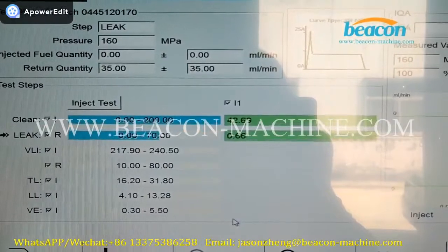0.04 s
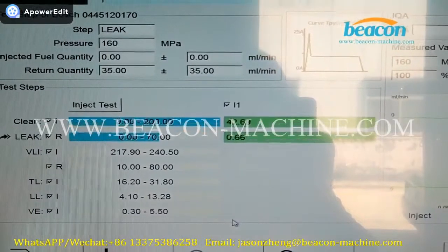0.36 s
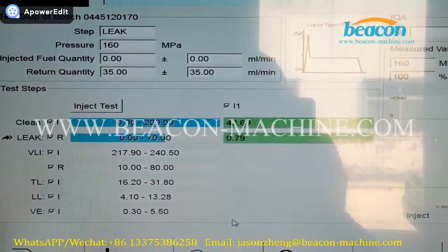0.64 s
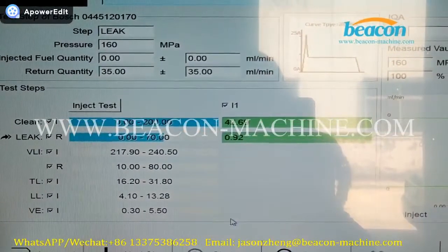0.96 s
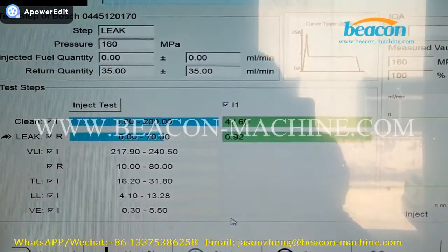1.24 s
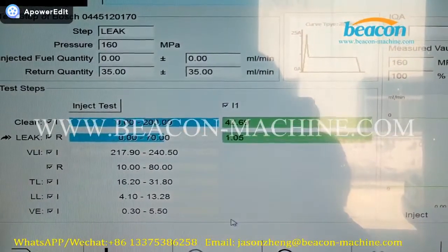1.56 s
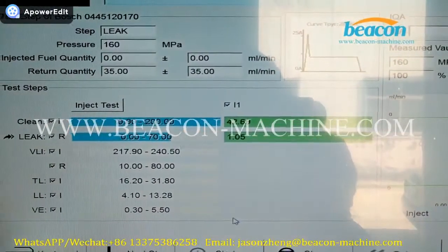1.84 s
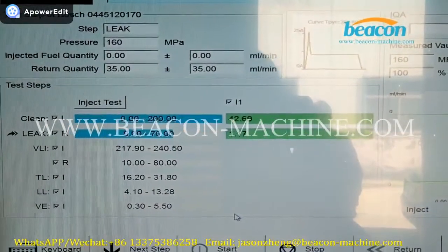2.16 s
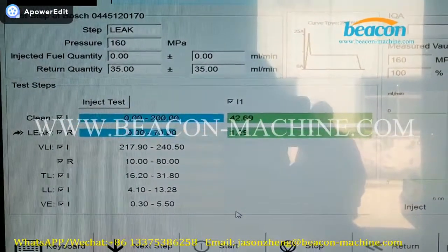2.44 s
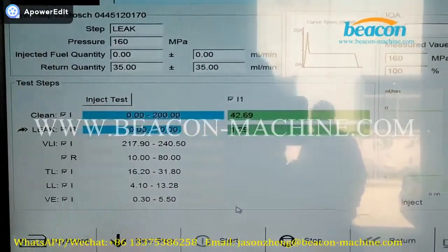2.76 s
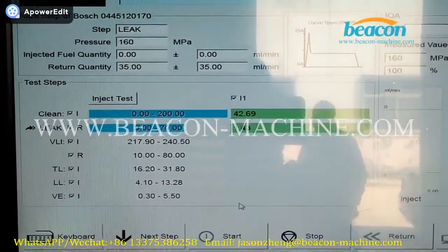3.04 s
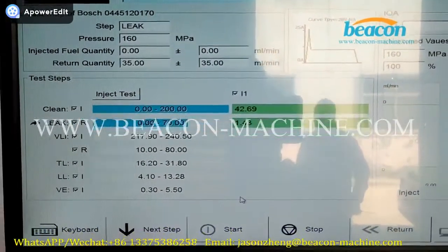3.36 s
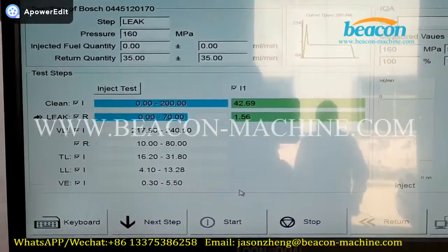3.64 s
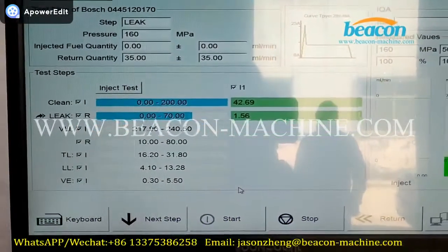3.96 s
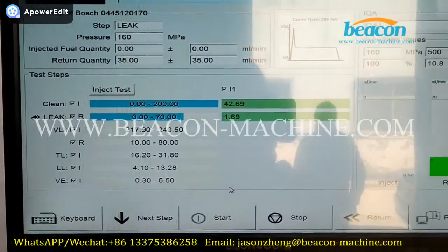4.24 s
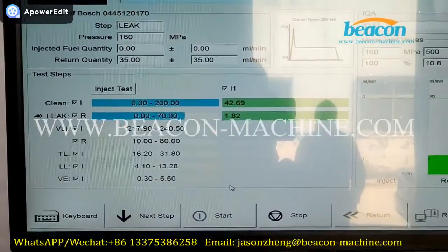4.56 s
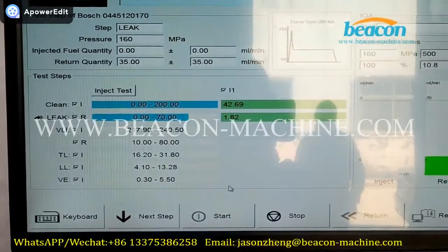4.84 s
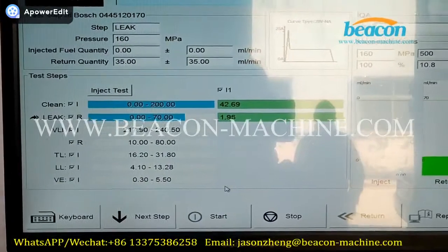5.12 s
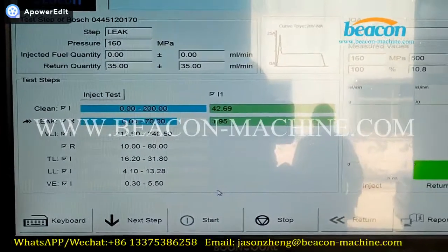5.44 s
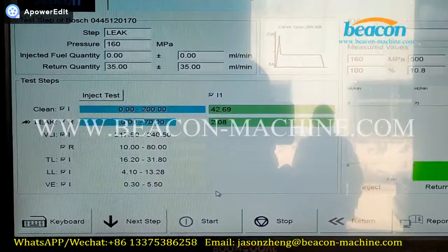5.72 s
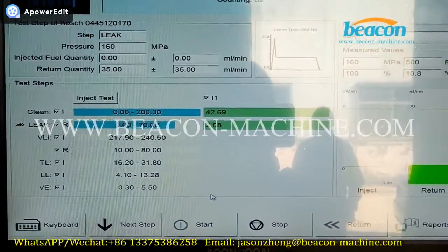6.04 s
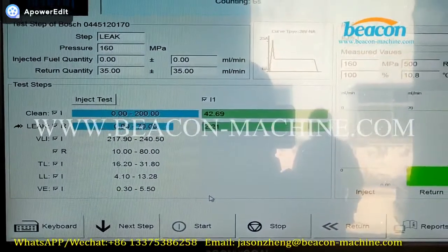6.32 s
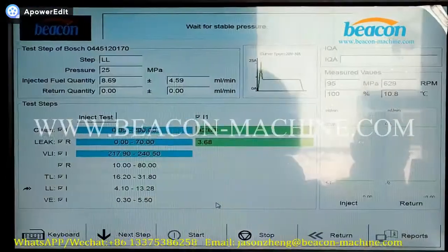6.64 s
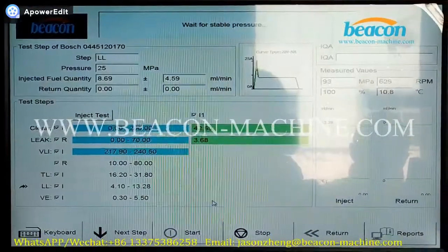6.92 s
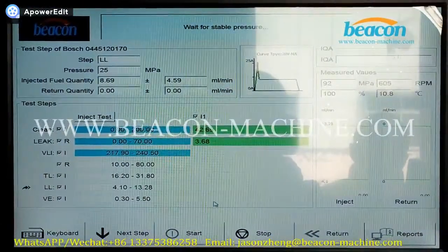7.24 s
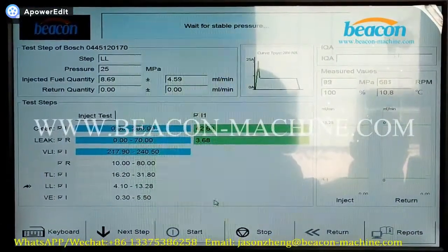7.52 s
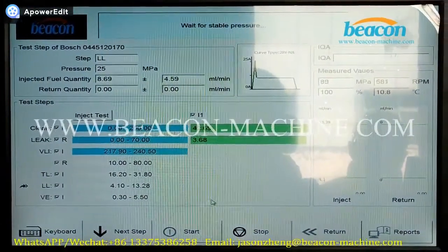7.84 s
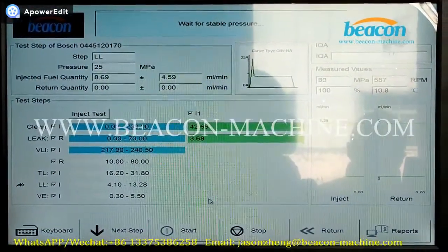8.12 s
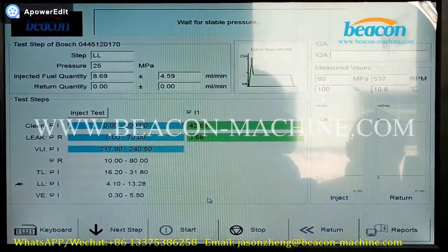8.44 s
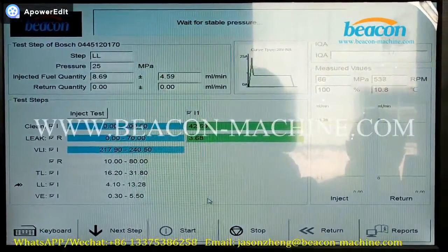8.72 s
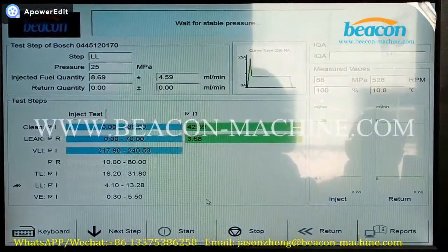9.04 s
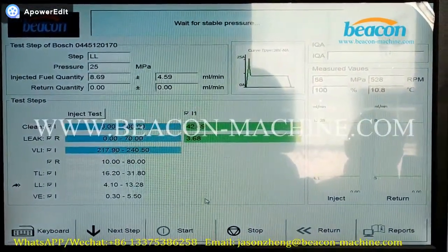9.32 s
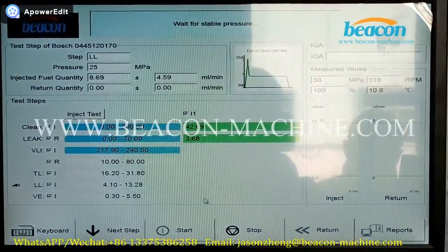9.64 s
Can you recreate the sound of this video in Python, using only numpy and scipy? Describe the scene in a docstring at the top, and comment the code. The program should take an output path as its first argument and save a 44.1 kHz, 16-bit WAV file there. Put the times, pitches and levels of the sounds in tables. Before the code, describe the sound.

Heard up close in a workshop, a test machine whines at a high, even pitch above fan noise and the fast, regular pulsing of a fuel pump that knocks now and then. About three quarters of the way through, a pressure valve opens abruptly and the sound becomes a louder, fuller drone: a harsh buzz, sputtering fuel hiss and irregular low throbs, with the whine continuing underneath.

```python
"""In a workshop, a diesel injector test bench runs, heard close by through two microphones.
Over fans and a hum, an inverter (the motor's electronic drive) whines around 4 kHz,
while the motor turns a fuel pump that throbs once a turn. After about 7.5 seconds
a pressure valve starts to buzz and spill fuel with a hiss, and the unloaded pump throbs unevenly."""
import sys
import numpy as np
from scipy import signal
from scipy.fft import rfft, irfft
from scipy.io import wavfile
from scipy.ndimage import uniform_filter1d, map_coordinates

SR = 44100
rng = np.random.default_rng(int(sys.argv[2]) if len(sys.argv) > 2 else 0)


def file_out(sig):
    """Save sig as 16-bit WAV at sys.argv[1]."""
    # one column per channel
    cols = np.atleast_2d(sig).T
    # limit, then scale
    lim = np.clip(cols, -1, 1)
    pcm = np.round(lim * 32767).astype(np.int16)
    wavfile.write(sys.argv[1], SR, pcm)


N = 435708
T = np.arange(N) / SR
FREQS = np.maximum(np.arange(N // 2 + 1) * SR / N, 1)

TURN_HZ, VALVE_HZ = 8.31, 100 / 3   # pump turns and valve ticks per second
CARRIER_HZ, STATOR_HZ = 4000, 16.95   # how fast the inverter switches and the motor's current swings
VALVE_OPENS_S, PUMP_REFILLS_S = 7.524, 7.88
MIC_DELAYS_S = np.array([[0], [0.00022]])   # left, right


def from_db(db):
    """Turn decibels into a gain to multiply by."""
    return 10 ** (np.asarray(db) / 20)


def at_hz(points, hz):
    """Read between the rows of a (Hz, value) table, giving every octave equal room."""
    known_hz, values = np.transpose(points)
    return np.interp(np.log(hz), np.log(known_hz), values)


def in_time(rows):
    """Join rows that begin with a time into one curve for each other column."""
    times, *columns = np.transpose(rows)
    return [np.interp(T, times, column) for column in columns]


def switch(at_s, rise_s):
    """A smooth step from 0 to 1."""
    return .5 + .5 * np.tanh((T - at_s) / rise_s)


def pan(db):
    """Left and right gains that make the left side db louder and keep the total power."""
    gains = from_db(np.array([[db], [-db]]) / 2)
    return gains / np.sqrt(np.mean(gains ** 2))


def drift(rate):
    """A smooth random wobble of size about 1, changing about rate times a second."""
    knots = rng.standard_normal(1000)
    coarse = map_coordinates(knots, [T[::50] * rate], order=3, mode="wrap")
    return np.interp(T, T[::50], coarse)


def with_turn(depth_db, place):
    """A gain that peaks at one place (0-1) in every pump turn."""
    return from_db(depth_db * np.cos(2 * np.pi * (TURN_HZ * T - place)))


def hump(hz, width_hz, at=FREQS):
    """The steep-sided shape of a resonance, in dB, with its top at 0."""
    return -20 * np.log10(1 + ((at - hz) / (0.68 * width_hz)) ** 2)


# How alike the two microphones sound. Each row: frequency in Hz, likeness from 0 to 1.
MIC_LIKENESS = [(30, .55), (120, .88), (300, .82), (700, .6), (4000, .6), (8000, .66), (15000, .5)]
# How far the left microphone's wave runs ahead. Each row: frequency in Hz, lead in radians.
LEFT_LEAD = [(20, 0), (340, .3), (690, 1.0), (1250, 3.0), (2600, 6.5), (4100, 11.0), (5400, 16.5),
             (6400, 18.8), (16000, 18.8)]
def noise(db_per_hz):
    """Stereo noise: a direct part that reaches the right side late, plus each side's own room sound."""
    direct, left, right = rfft(rng.standard_normal((3, N)))
    alike = at_hz(MIC_LIKENESS, FREQS)
    arriving = np.array([direct, direct * np.exp(-1j * at_hz(LEFT_LEAD, FREQS))])
    mixed = np.sqrt(alike) * arriving + np.sqrt(1 - alike) * np.array([left, right])
    return irfft(mixed * from_db(db_per_hz) * np.sqrt(SR / 2), N)


def tone(hz, level_db, pan_db, lead, waver_db, start=0):
    """A pure tone that wavers as the microphones move through the room's loud and quiet spots."""
    angle = 2 * np.pi * (hz * T + start) - lead * np.array([[0], [1]])
    return np.sqrt(2) * from_db(level_db + waver_db * drift(1.582)) * pan(pan_db) * np.sin(angle)


def beating_phases(multiples, level_db, lead, depth, beats=1, tries=800, centre=0, spread=1):
    """Pick the random wave starts (in turns) whose sum best swells by depth, beats times a cycle."""
    starts = centre + spread * (rng.random((tries, len(multiples))) - .5)
    waves = from_db(level_db)[:, None] * np.exp(2j * np.pi * np.outer(multiples, np.arange(256) / 256))
    sides = np.exp(2j * np.pi * starts - 1j * np.array([0 * lead, lead])[:, None]) @ waves
    ripple = abs(rfft(abs(sides) ** 2))
    wanted = depth / 2 * (np.arange(ripple.shape[-1]) == beats)
    miss = np.sum((ripple / ripple[..., :1] - wanted) ** 2, axis=(0, 2))
    return starts[miss.argmin()]


def cycle(rate_hz, level_db, pan_db, lead, depth=0, delay_s=0, spread=1):
    """A rough sound that repeats exactly, built from harmonics (whole multiples of its rate)."""
    size = 2 ** 14
    gains = from_db(level_db + np.array([pan_db, -pan_db]) / 2)
    gains /= np.sqrt(np.cosh(pan_db * np.log(10) / 20))   # panning keeps the power
    centre = -rate_hz * np.cumsum(np.broadcast_to(delay_s, lead.shape))
    start = beating_phases(np.arange(len(lead)), level_db, lead, depth, centre=centre, spread=spread)
    harmonics = gains * np.exp(2j * np.pi * start - 1j * np.array([0 * lead, lead]))
    waves = irfft(np.pad(harmonics, ((0, 0), (1, 0))), size) * size / np.sqrt(2)
    return np.array([np.interp(T * rate_hz % 1 * size, np.arange(size), wave) for wave in waves])


def swells(rows, hz, half_s, detune, squareness=2, fade=1):
    """For each (peak second, dB) row a note swells, then dies away fade times as fast as it rose."""
    out = np.zeros((2, N))
    for (peak_s, level_db), chance in zip(rows, rng.standard_normal(len(rows))):
        near = slice(*np.searchsorted(T, [peak_s - 4 * half_s, peak_s + 4 * half_s]))
        t = T[near] - peak_s - MIC_DELAYS_S
        envelope = np.exp(-.5 * abs(np.where(t > 0, fade, 1) * t / half_s) ** squareness)
        note = np.cos(2 * np.pi * hz * (1 + detune * chance) * t)
        out[:, near] += np.sqrt(2) * from_db(level_db) * envelope * note
    return out


# Fans and flow in the cabinet. Each row: frequency in Hz, level in dB per Hz.
CABINET_NOISE = [(20, -101), (35, -95), (90, -78.5), (300, -75.5), (700, -98), (1000, -81.5), (1600, -86),
                 (2300, -92), (3000, -86.5), (3400, -86), (4550, -87.5), (5000, -82), (7000, -92),
                 (10000, -99), (14000, -102)]
def cabinet(opened, stall_share=0.65, flow_hz=380):
    """Fans and flow rush; the low part stalls from when the valve opens until the pump refills."""
    air = noise(at_hz(CABINET_NOISE, FREQS)) * from_db(drift(20)) * with_turn(1.0, 0.22)
    flow = irfft(rfft(air) * (FREQS < flow_hz), N)
    stalled = opened * (1 - switch(PUMP_REFILLS_S, .06))
    return air - stall_share * flow * stalled


# A faint scuff. Each row: peak in seconds, half length in seconds, pitch in Hz, width in Hz, dB per Hz.
SCUFFS = [(6.846, 0.059, 2100, 1800, -84.5)]
def scuff():
    """Something scuffs in the workshop: a short, soft puff of noise."""
    return sum(noise(db + hump(hz, width)) * np.exp(-.5 * ((T - peak_s) / half_s) ** 2)
               for peak_s, half_s, hz, width, db in SCUFFS)


# Light taps on a panel. Each row: start in seconds, level in dB.
TAPS = [(4.253, -52), (4.436, -38), (4.796, -50)]
# The notes the panel rings with. Each row: pitch in Hz, dB added to the tap's level.
PANEL_NOTES = [(870, -10), (974, 0)]
def panel_taps(ring_s=.03):
    """Each tap sets the panel ringing; it fades by 60 dB in ring_s."""
    out = np.zeros((2, N))
    for start_s, level_db in TAPS:
        near = slice(*np.searchsorted(T, [start_s, start_s + 2 * ring_s]))
        t = np.maximum(T[near] - start_s - MIC_DELAYS_S, 0)
        for hz, db in PANEL_NOTES:
            out[:, near] += from_db(level_db + db - 60 * t / ring_s) * np.sin(2 * np.pi * hz * t)
    return out


# Thin electronic tones. Each row: pitch in Hz, base level in dB, pan in dB, left lead in radians.
THIN_TONES = [(550, -59.8, -1, 1.4), (4829, -69.3, -3, -0.1), (5000, -66.4, 0, 1.7), (7747, -64.1, 0, 0.1),
              (7966, -67.1, 0, 0.1), (8000, -58.0, 0, -0.1), (8034, -65.1, 2, 0.1), (8247, -66.5, 1, 0)]
# How they rise and fall together. Each row: time in seconds, added level in dB.
THIN_GAIN = [(0.1, 1.5), (0.9, 2.5), (3.2, -0.5), (3.5, 4.5), (4.0, 2), (4.4, 2), (5.0, 2.5), (5.4, 1.5),
             (5.8, -1), (6.7, -0.5), (7.45, -2), (7.6, -6)]
def electronics():
    """The electronics give off thin tones of steady pitch."""
    tones = sum(tone(*row, waver_db=1.0, start=rng.random()) for row in THIN_TONES)
    return tones * from_db(in_time(THIN_GAIN)[0])


# The tone an octave above the whistle. Each row: time in seconds, base level in dB.
WHISTLE_OCTAVE = [(0.2, -62), (0.85, -60.5), (1.3, -62), (2.5, -60.5), (3.1, -58.5), (3.7, -58.5),
                  (4.8, -65.5), (5.4, -57), (6.2, -62.5), (6.9, -64)]
def whistle(opened, hz=1250):
    """A steady whistle and its octave; both get quieter when the valve opens."""
    lead = -2.61 + .06 * T   # shifts as the microphones move
    main = tone(hz, -45 - 12 * opened, pan_db=3, lead=lead, waver_db=.5)
    octave_db = in_time(WHISTLE_OCTAVE)[0] - 0.5 - 9.1 * opened
    return main + tone(2 * hz, octave_db, pan_db=-2, lead=.4, waver_db=.5)


# Mains hum and tones of the frame. Each row: pitch in Hz, level in dB.
FRAME_TONES = [(250, -53), (300, -51), (383.3, -57.5), (386.3, -57.5), (483, -62)]
def frame_hum(opened):
    """The frame hums until the load comes off; two close pitches beat against each other."""
    tones = sum(tone(hz, db, 0, at_hz(LEFT_LEAD, hz), waver_db=.5, start=rng.random())
                for hz, db in FRAME_TONES)
    return tones * (1 - opened)


def motor_load(first_s=1.33, every_s=1.5, rebound_s=0.32, half_s=0.1):
    """The motor slips behind its magnetic field, so its load (0-1) peaks and rebounds in a slow beat."""
    since = T - first_s - np.array([[0], [rebound_s]])
    from_peak_s = (since + every_s / 2) % every_s - every_s / 2
    peak, rebound = np.exp(-.5 * (from_peak_s / half_s) ** 2)
    return peak + rebound


def motor_hum(opened, drop_db=23, return_db_per_s=6.5):
    """The hum throbs each turn and swells with the load; it drops as the valve opens and creeps back."""
    relief_db = opened * (drop_db - return_db_per_s * (T - VALVE_OPENS_S))
    level_db = -43 + 2.5 * motor_load() - relief_db
    return tone(317.2, level_db, pan_db=-2, lead=-.1, waver_db=1.0) * with_turn(1.0, 0.22)


def outer_sidebands(fall_db=0.52, triple_loss_db=6.5, upper_gain_db=3.5):
    """More SIDEBANDS rows, fading outward; the motor's three phases weaken the multiples of three."""
    multiples = np.r_[-27:-8:2, 9:28:2]
    level_db = -55 - fall_db * (abs(multiples) - 9) + upper_gain_db * (multiples > 0)
    level_db -= triple_loss_db * (multiples % 3 == 0)
    room_scatter = 1.46 * rng.standard_normal(len(multiples))
    leads = at_hz(LEFT_LEAD, CARRIER_HZ) + room_scatter
    return [(multiple, db, -6, lead) for multiple, db, lead in zip(multiples, level_db, leads)]


def hold_level(sound):
    """Keep the joint level of wavering tones steady, so that one gains what another loses."""
    power = np.mean(sound ** 2, axis=0)
    return sound * np.sqrt(power.mean() / uniform_filter1d(power, size=int(4 * SR / STATOR_HZ)))


# The whine's main tones, on both sides of the carrier.
# Each row: steps of STATOR_HZ from the carrier, base level in dB, pan in dB, left lead in radians.
SIDEBANDS = [(-7, -49, -5, 3.0), (-5, -45.4, -2, -1.4), (-3, -50.5, -1, -2.2), (-1, -45.3, 4, 1.6),
             (1, -45.2, 3, -3.0), (3, -50, 2, 1.4), (5, -42.1, -6, -1.1), (7, -52, -2, 0)]
# The stator rate races as the load comes off. Each row: time in seconds, extra rate in Hz.
STATOR_RACE = [(7.45, 0), (7.55, 1.0), (8.2, .8), (9.0, .35), (9.88, .05)]
def sidebands():
    """The motor sings at the carrier plus and minus odd multiples of its stator rate."""
    rows = list(SIDEBANDS) + outer_sidebands()
    multiples, levels_db, _, leads = np.transpose(rows)
    starts = beating_phases(multiples, levels_db, leads, depth=.55, beats=4, tries=4000)
    turns_ahead = np.cumsum(in_time(STATOR_RACE)[0]) / SR
    out = np.zeros((2, N))
    for (multiple, db, pan_db, lead), start in zip(rows, starts):
        hz = CARRIER_HZ + multiple * STATOR_HZ
        out += tone(hz, db, pan_db, lead, waver_db=1.4, start=start + multiple * turns_ahead)
    return hold_level(out)


# Hiss near the carrier and its multiples. Each row: centre in Hz, width in Hz, base level in dB per Hz.
CARRIER_HISS = [(3905, 420, -70.8), (7947, 450, -77), (11850, 650, -84.3), (15600, 370, -87)]
# How loud the whine is. Each row: time in seconds, level in dB (reference_db leaves it unchanged).
WHINE_LEVEL = [(0.05, -41.5), (0.8, -41), (1.05, -40.5), (1.75, -41), (2.7, -40.5), (3.05, -40.5),
               (3.7, -41), (4.2, -39.5), (4.5, -39.5), (4.9, -39), (5.35, -41), (5.6, -40), (6.8, -40.8),
               (7.25, -39), (7.65, -42), (8.3, -42), (8.6, -43), (9.8, -43.5)]
def inverter(opened, reference_db=-39):
    """The inverter's fast switching makes a whine of many tones, wrapped in flickering hiss."""
    whine = sidebands() * from_db(1.15 - opened)
    first_power, *upper_powers = [from_db(db + hump(hz, width)) ** 2 for hz, width, db in CARRIER_HISS]
    hiss = noise(10 * np.log10(first_power)) * from_db(2.0 * drift(20) + 1.8 * opened)
    pulse_db = 1.5 * np.cos(2 * np.pi * STATOR_HZ * T)
    sizzle = noise(10 * np.log10(sum(upper_powers))) * from_db(2.3 * drift(45) + pulse_db + 0.5 * opened)
    return (whine + hiss + sizzle) * from_db(in_time(WHINE_LEVEL)[0] - reference_db)


# The loaded pump's growl. Each row: frequency in Hz, level in dB of a harmonic there.
PUMP_GROWL = [(16, -87), (25, -69), (34, -96), (50, -73), (75, -57.5), (150, -59.5), (196, -62),
              (250, -55.5), (330, -51.5), (385, -71), (600, -72.5), (800, -78.5), (1400, -106),
              (3000, -101)]
# Fuel churning in the pump. Each row: frequency in Hz, level in dB per Hz.
PUMP_CHURN = [(25, -88), (38, -95), (52, -79), (90, -76.5), (200, -80), (310, -70.5), (420, -81.5),
              (620, -82), (900, -100)]
# The pump's hard knocks. Each row: peak in seconds, level in dB.
HARD_KNOCKS = [(0.266, -35), (1.229, -31), (1.35, -31), (1.838, -34), (2.672, -29), (2.793, -30.5),
               (3.728, -30.5), (4.234, -28.5), (4.356, -27), (4.475, -33), (5.8, -27), (5.92, -32),
               (6.408, -28.5), (6.76, -36), (7.243, -29), (7.364, -30)]
# Swells in one turn. Each row: place in the turn (0-1), pitch in Hz, half length in seconds, level in dB.
TURN_SWELLS = [(0.88, 195.5, 0.02, -33), (.17, 312, 0.0087, -45.5), (0.15, 126, 0.013, -54),
               (0.5, 465, 0.0043, -53.5)]
def loaded_pump(uneven_db=1.07, jitter_s=0.00011):
    """Every turn repeats the same growl and swells, a little stronger or weaker; at times it knocks."""
    harmonics_hz = TURN_HZ * np.arange(1, 360)
    lead = at_hz(LEFT_LEAD, harmonics_hz) + 0.45 * rng.standard_normal(len(harmonics_hz))
    growl = cycle(TURN_HZ, at_hz(PUMP_GROWL, harmonics_hz), np.zeros_like(lead), lead)
    growl *= from_db(0.6 * drift(14))
    out = (growl + noise(at_hz(PUMP_CHURN, FREQS))) * with_turn(0.21, 0.99)
    out += swells(HARD_KNOCKS, hz=317.0, half_s=0.012, detune=0.0075)
    turns = np.arange(int(T[-1] * TURN_HZ))
    for place, hz, half_s, level_db in TURN_SWELLS:
        timing, strength = rng.standard_normal((len(turns), 2)).T
        peaks_s = (turns + place) / TURN_HZ + jitter_s * timing
        rows = np.column_stack([peaks_s, level_db + uneven_db * strength])
        out += swells(rows, hz, half_s, detune=0.007)
    return out * pan(0.97)


# Throbs of the unloaded pump. Each row: peak in seconds, level in dB.
THROBS = [(7.729, -24), (7.845, -25.5), (7.948, -28.5), (8.04, -30.5), (8.171, -26), (8.281, -25),
          (8.397, -33), (8.512, -31), (8.619, -28.5), (8.735, -34), (8.845, -37), (9.092, -27.5),
          (9.212, -32.5), (9.292, -34), (9.436, -31), (9.556, -28.5), (9.671, -29.5), (9.79, -35.5)]
# Knocks in the fuel line. Each row: peak in seconds, level in dB.
LINE_KNOCKS = [(7.905, -40), (8.29, -42), (8.61, -45), (8.73, -38), (9.31, -37.5), (9.5, -41.5)]
# The unloaded pump's rumble. Each row: frequency in Hz, level in dB per Hz.
PUMP_RUMBLE = [(40, -99), (75, -88), (100, -59), (130, -75), (190, -57), (250, -64.5), (330, -62.5),
               (430, -92), (900, -110)]
def unloaded_pump():
    """As the pressure falls, uneven throbs build, thud and stop short, over knocks and rumble."""
    throbs = swells(THROBS, hz=194.4, half_s=0.024, detune=0.012, squareness=3.3, fade=1.5)
    thuds = from_db(-11) * swells(THROBS, hz=249, half_s=0.0093, detune=0.12, fade=1.3)
    knocks = swells(LINE_KNOCKS, hz=99.0, half_s=0.018, detune=0.046)
    rumble = noise(at_hz(PUMP_RUMBLE, FREQS)) * switch(PUMP_REFILLS_S, 0.025)
    return (throbs + thuds + knocks + rumble) * pan(-7.5)


# The fuel jet's whistle. Each row: time in seconds, pitch in Hz, base level in dB.
JET_WHISTLE = [(7.52, 7740, -60), (7.65, 7500, -47.5), (8.0, 7370, -46.5), (8.4, 7330, -45),
               (9.0, 7240, -51), (9.88, 7100, -48.5)]
def fuel_jet():
    """The jet whistles in uneven spurts, sinking in pitch as the pressure falls."""
    jet_hz, jet_db = in_time(JET_WHISTLE)
    centre_hz = np.median(jet_hz)
    band = signal.hilbert(noise(hump(centre_hz, width_hz=320)))
    gliding = np.real(band * np.exp(2j * np.pi * np.cumsum(jet_hz - centre_hz) / SR))
    spurts_db = 5 * np.minimum(drift(85), 1.3)
    return gliding / np.std(gliding) * from_db(jet_db - 1.5 + spurts_db) * pan(6.6)


# Fuel rushing through the valve. Each row: frequency in Hz, base level in dB per Hz.
SPILL_RUSH = [(250, -91), (420, -67.5), (650, -70), (1000, -68), (1230, -65), (1400, -68.5), (1700, -80.5),
              (2800, -80.5), (3300, -81), (4750, -93), (5400, -80.5), (6100, -92), (9000, -94.5),
              (13500, -97.5), (15500, -99)]
# Bands where the fuel spits. Each row: centre in Hz, width in Hz, base level in dB per Hz.
SPILL_SPUTTER = [(5300, 600, -78), (6400, 500, -86), (9800, 1500, -92.5), (13000, 2600, -92)]
def fuel_spill(rush_fall_db_per_s=1.0, sputter_fall_db_per_s=2.5):
    """Fuel rushes, sputters and whistles through the valve, easing as the pressure falls."""
    since = np.maximum(T - VALVE_OPENS_S, 0)
    rush = noise(at_hz(SPILL_RUSH, FREQS)) * from_db(1.84 - rush_fall_db_per_s * since + 0.9 * drift(40))
    sputter = sum(noise(db + hump(hz, width)) * from_db(6 * np.tanh(drift(50)))
                  for hz, width, db in SPILL_SPUTTER)
    sputter *= from_db(-sputter_fall_db_per_s * since)
    return rush * with_turn(0.75, 0.2) + (fuel_jet() + sputter) * with_turn(1.5, 0.2)


def settle(buzz, split_hz=1100, treble_fades_s=0.24, body_grows_s=0.97):
    """The valve bursts in hard and bright; its treble dies back while its lower body grows."""
    since = np.maximum(T - VALVE_OPENS_S, 0)
    treble = irfft(rfft(buzz) * (FREQS > split_hz), N)
    treble_db = 4 * np.exp(-since / treble_fades_s)
    body_db = 1.13 - 3 * np.exp(-since / body_grows_s)
    return treble * from_db(treble_db) + (buzz - treble) * from_db(body_db)


# The valve's rattle. Each row: frequency in Hz, level in dB of a harmonic there.
VALVE_RATTLE = [(33, -88), (130, -76), (200, -70), (400, -83), (1400, -57.5), (1700, -61.5), (2100, -65.5),
                (2750, -62), (3050, -67), (3250, -75), (5000, -112)]
# The notes that the valve and its pipes ring with.
# Each row: pitch in Hz, width in Hz, base level in dB, pan in dB, left lead in radians.
VALVE_NOTES = [(367, 18, -47.5, -34, 2), (433, 15, -43.5, 2, 1.52), (521, 34, -45, 16, 1.37),
               (740.6, 75, -35.5, -4, 0.87), (778, 35, -35.5, -3.5, 2.5), (790, 90, -43.5, 6.5, 3),
               (899, 35, -40, 11.5, 1.35), (956.6, 77, -39, 5, 2.5), (1037, 34, -46, 12, 0.52),
               (1173, 45, -45.5, 4.5, -2.5), (1222, 65, -42, -1, 2), (1285, 54, -46, 8, 1),
               (1490, 140, -66.5, 15.5, -3.5), (1862, 65, -54.5, 22, -2.5), (2295, 28, -49.5, 5, -1.5),
               (2670, 150, -61, 9, -1.5)]
# Each tick starts low and its main notes ring on. Each row: frequency in Hz, delay in seconds.
TICK_DELAY = [(430, -.005), (620, -.002), (720, .005), (800, .009), (950, .011), (1100, .003), (1300, .003)]
# How much the room blurs a tick. Each row: frequency in Hz, blur from 0 to 1.
TICK_BLUR = [(400, .25), (700, .4), (1200, .55), (1700, .9)]
def valve(scatter_db=3.0):
    """The valve ticks every 30 ms and rings on, making a buzz; the room scatters its rattle."""
    harmonics_hz = VALVE_HZ * np.arange(1, 150)
    level_chance, pan_chance, lead_chance = rng.standard_normal((3, len(harmonics_hz)))
    rattle_db = at_hz(VALVE_RATTLE, harmonics_hz) + scatter_db * level_chance
    rattle = [rattle_db, scatter_db * pan_chance, at_hz(LEFT_LEAD, harmonics_hz) + lead_chance]
    # each harmonic takes the note that carries it best, or the rattle if that is louder
    notes_db = np.array([db + hump(hz, width, harmonics_hz) for hz, width, db, *_ in VALVE_NOTES])
    *_, pan_db, lead = np.array(VALVE_NOTES)[notes_db.argmax(axis=0)].T
    ring_db = notes_db.max(axis=0)
    harmonics = np.where(ring_db > rattle_db, [ring_db, pan_db, lead], rattle)
    buzz = cycle(VALVE_HZ, *harmonics, depth=.32,
                 delay_s=at_hz(TICK_DELAY, harmonics_hz), spread=at_hz(TICK_BLUR, harmonics_hz))
    return settle(buzz) * from_db(-0.5 + 0.23 * drift(6.1))


def shade_right(sound, depth_db):
    """The right microphone faces away, so the highest sounds lean to the left."""
    tilt_db = depth_db * np.interp(FREQS, [7500, 10000], [0, 1])
    return irfft(rfft(sound) * from_db(np.array([tilt_db, -tilt_db]) / 2), N)


def scene():
    """The bench runs under load, then with its valve open."""
    opened = switch(VALVE_OPENS_S, 0.00064)
    loaded = 1 - switch(VALVE_OPENS_S, 0.0091)
    background = cabinet(opened) + scuff() + panel_taps()
    tones = electronics() + whistle(opened) + frame_hum(opened) + motor_hum(opened)
    bench = background + tones + inverter(opened) + loaded * loaded_pump() + unloaded_pump()
    release = fuel_spill() + valve()
    return shade_right(bench, depth_db=3.0) + opened * shade_right(release, depth_db=14.0)


def record(dry, cutoff_hz=15800):
    """A steep filter removes the very highest treble."""
    return signal.sosfilt(signal.ellip(12, .1, 90, cutoff_hz, fs=SR, output="sos"), dry)


dry = scene()
out = record(dry)
file_out(out)
```